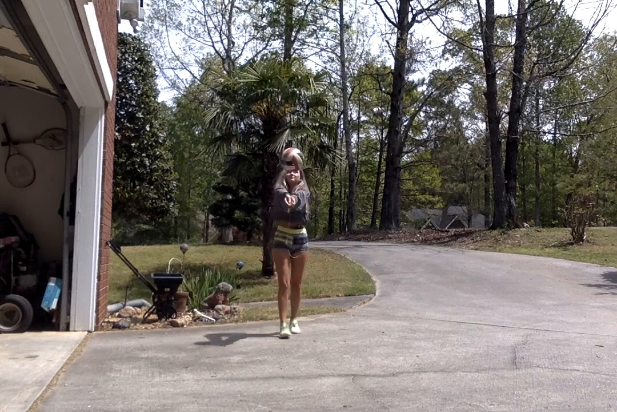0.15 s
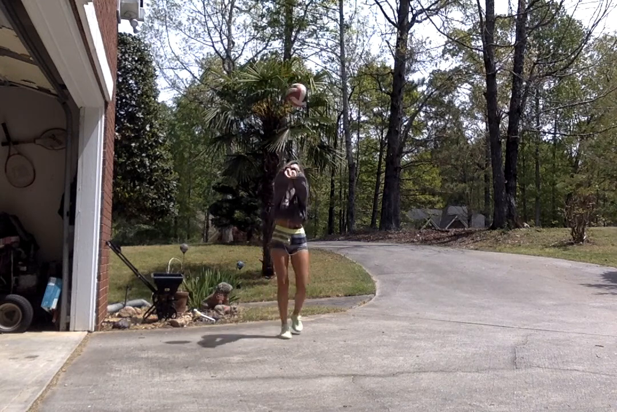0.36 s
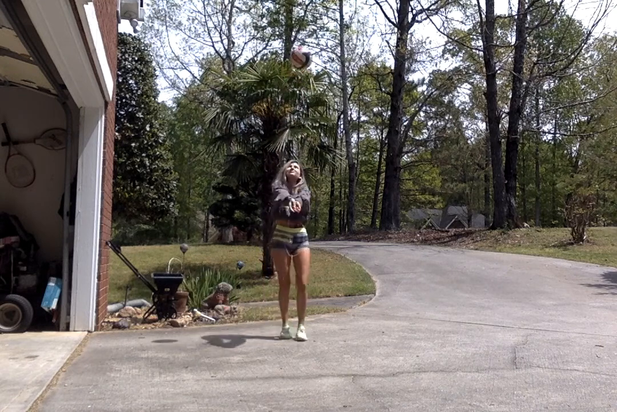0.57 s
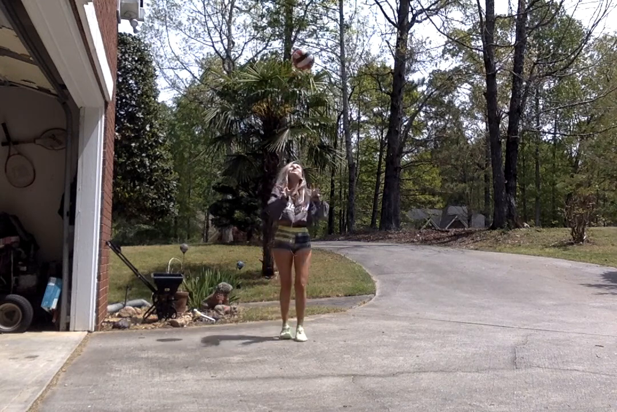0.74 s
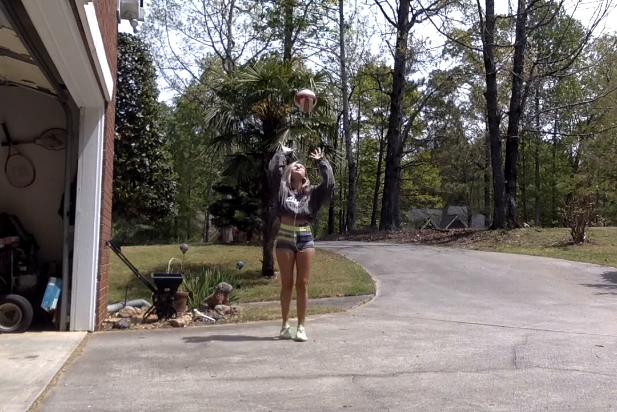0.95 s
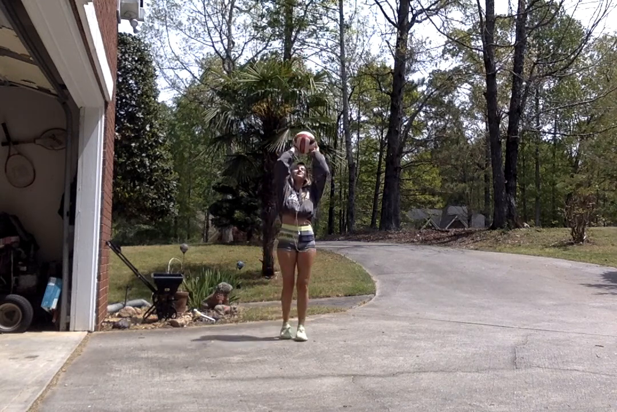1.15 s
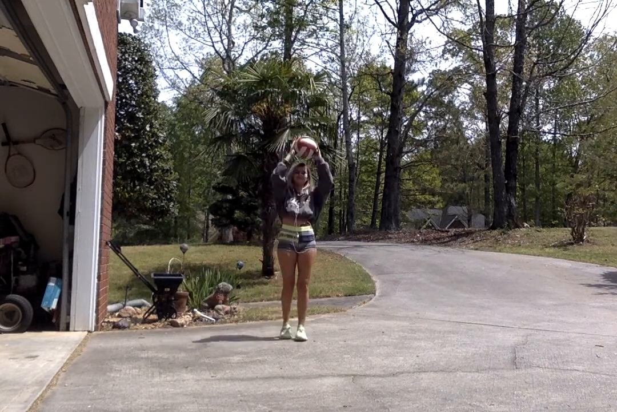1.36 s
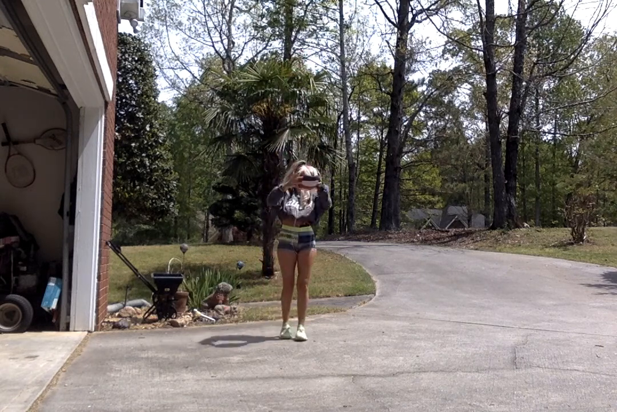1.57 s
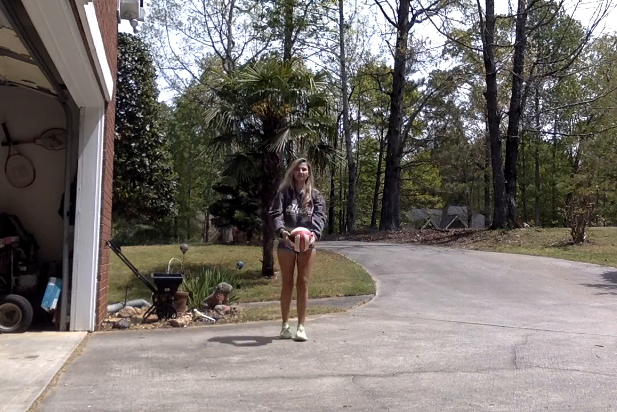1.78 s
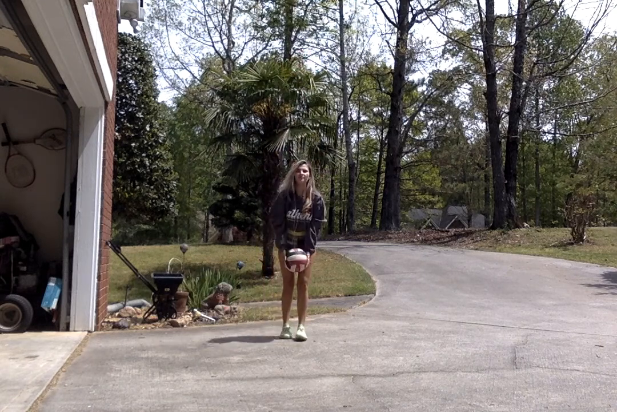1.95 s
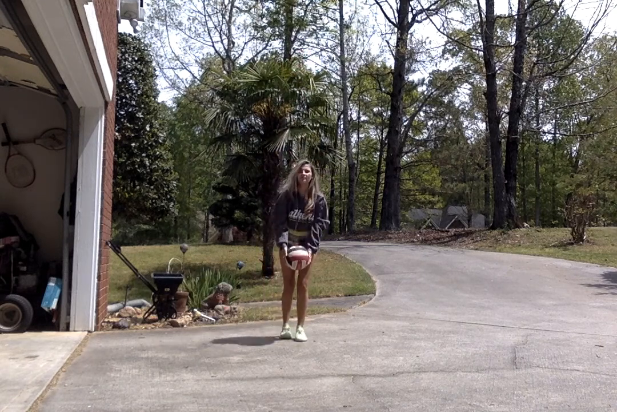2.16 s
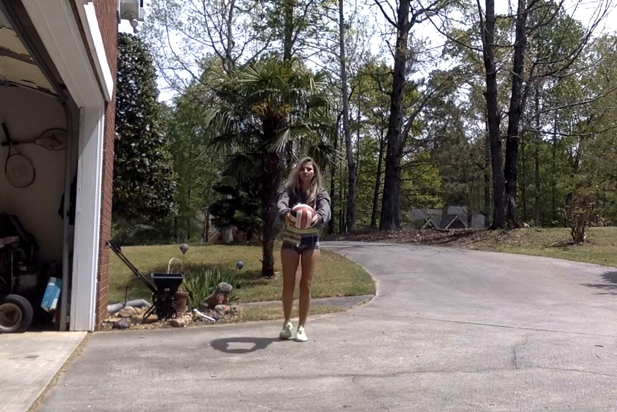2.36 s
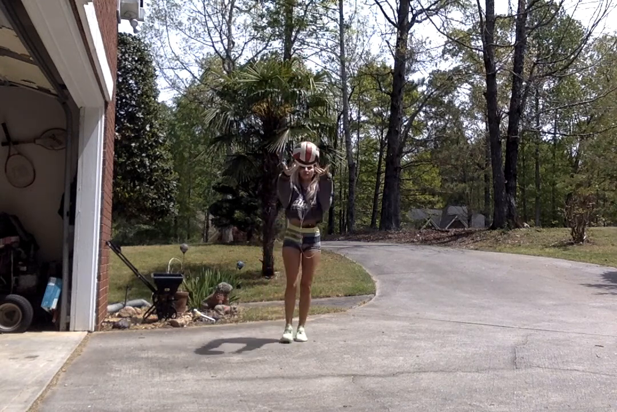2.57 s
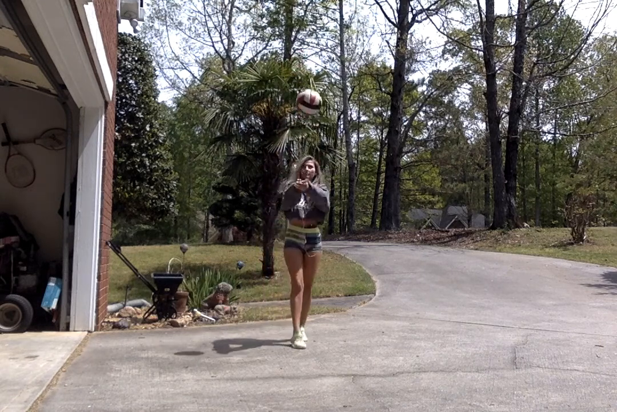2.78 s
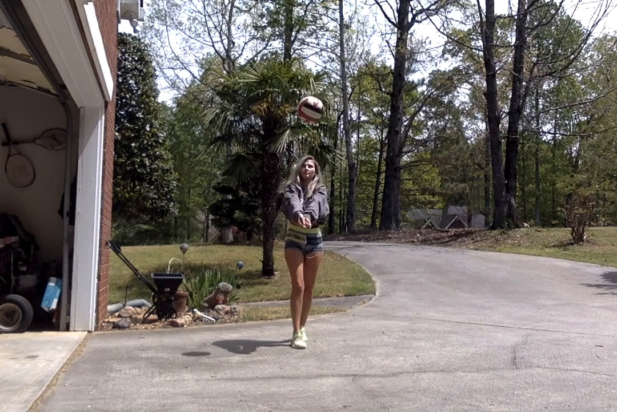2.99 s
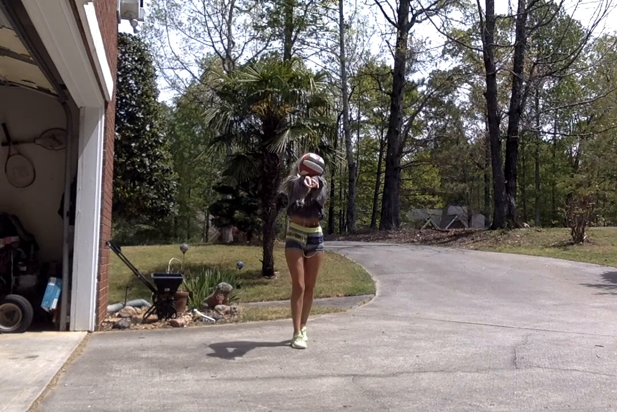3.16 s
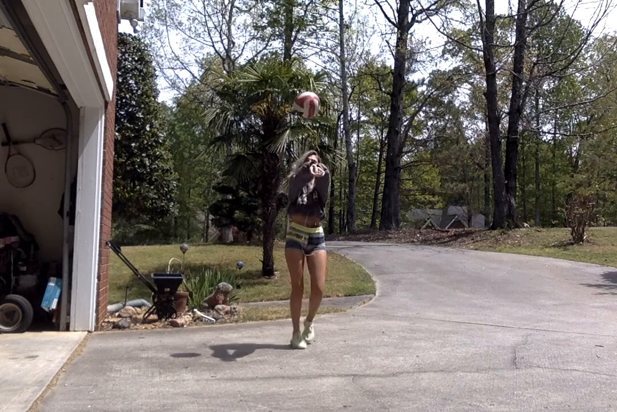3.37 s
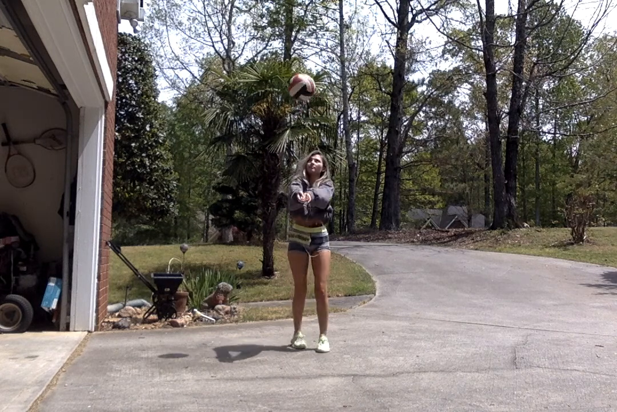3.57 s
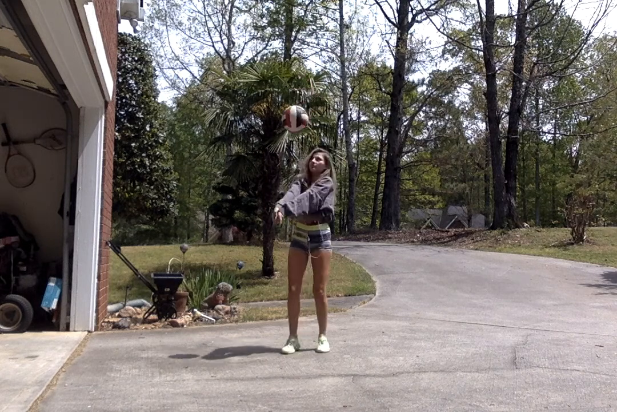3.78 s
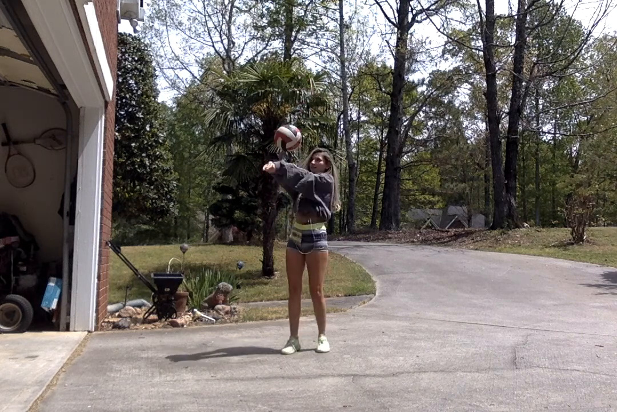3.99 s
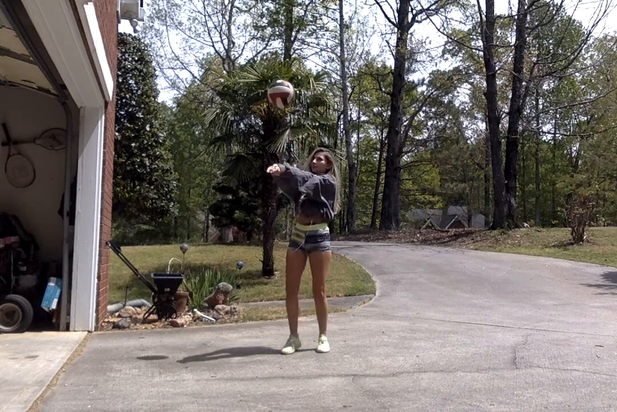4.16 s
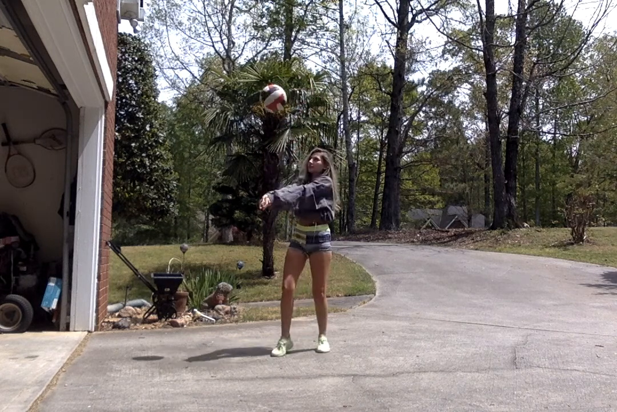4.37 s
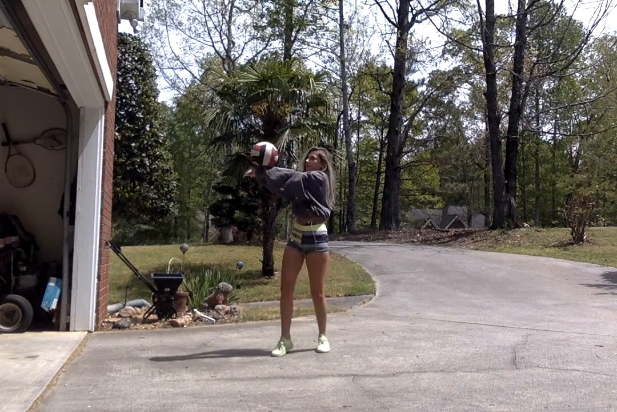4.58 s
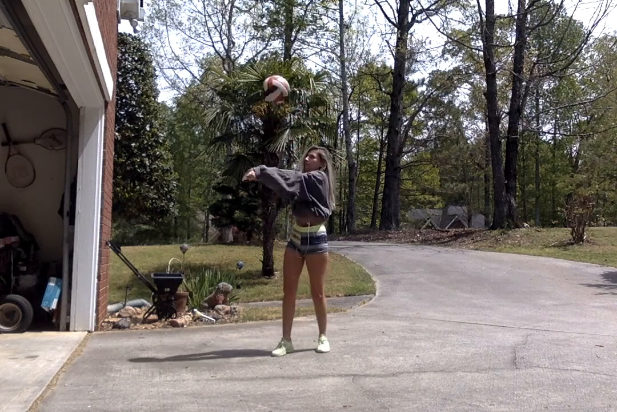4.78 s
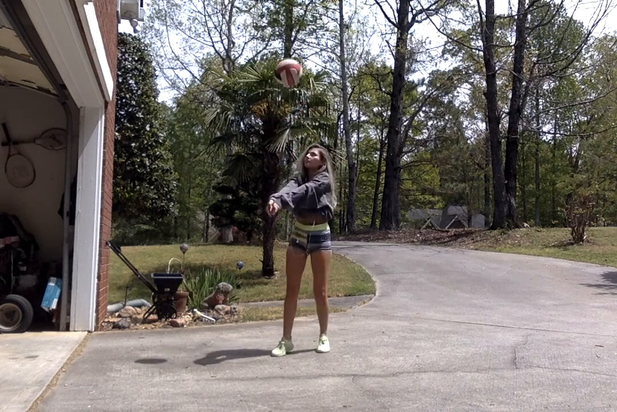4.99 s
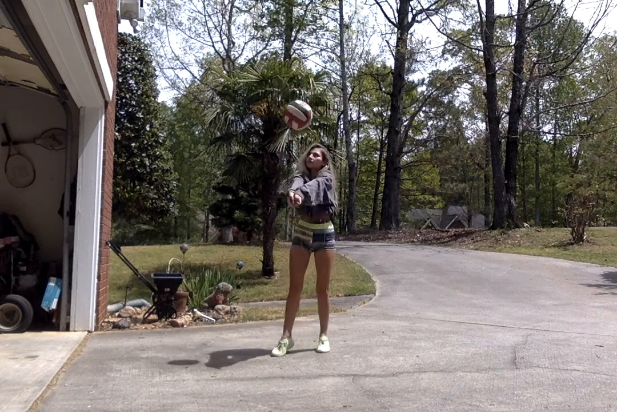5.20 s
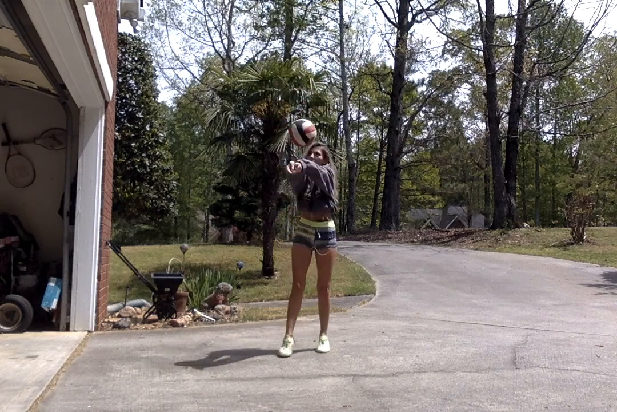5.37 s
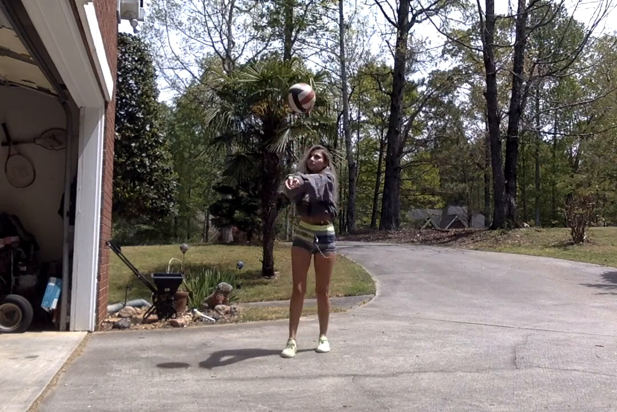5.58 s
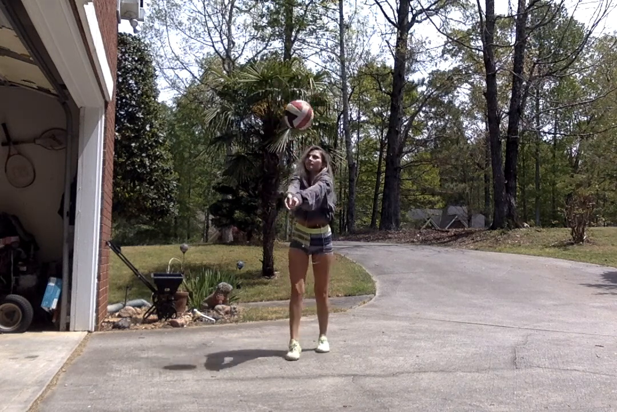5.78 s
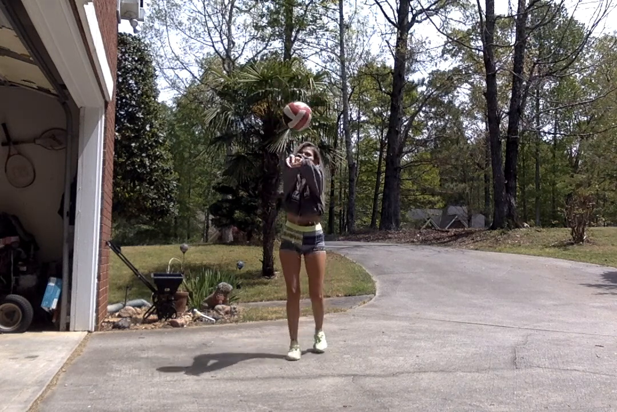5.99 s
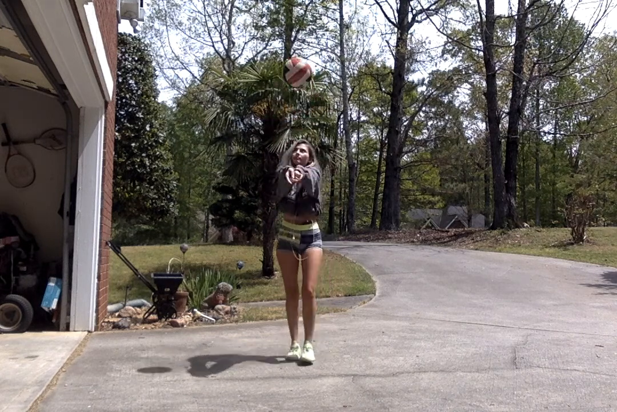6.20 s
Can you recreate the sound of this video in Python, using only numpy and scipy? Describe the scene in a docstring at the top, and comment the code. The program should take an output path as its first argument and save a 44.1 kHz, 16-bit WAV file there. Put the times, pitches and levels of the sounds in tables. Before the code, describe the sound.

Six sharp volleyball bumps slap and thump off forearms on a driveway, with light palm smacks, hollow wind buffeting, low hum and faint bird whistles.

```python
"""Volleyball beside an open garage

A ball is bumped off the forearms, caught and bumped again: each bump sums a slap (a noise burst coloured by the
microphone's housing), a thump (a sine sinking in pitch) and a ring (decaying air modes). Palms, brushes and
taps reuse the slap. Walls and garage answer by convolution with decaying noise. A breeze buffets the microphone
port with coloured noise and short tones, a bird whistles thin gliding sines, and the neighbourhood hums as
steady noise."""
import sys
import numpy as np
from scipy import signal
from scipy.io import wavfile

SR = 44100
rng = np.random.default_rng(int(sys.argv[2]) if len(sys.argv) > 2 else 0)


def transcribe(u):
    """Save the signal u as a 16-bit wav file named by the first command-line argument.

    u: samples, shape (n,) or (channels, n), limited to [-1, 1]; the rate is SR.
    q: integer samples, one column per channel.
    """
    v = np.clip(np.atleast_2d(u).T, -1, 1)
    q = np.round(v * 32767).astype(np.int16)
    wavfile.write(sys.argv[1], SR, q)


N = 275184
TIME = np.arange(N) / SR

# All table levels are relative; the functions apply further gains.
# Turbulent gusts: crest t/s, buffeting level/dB, rush level/dB, rise width/s, fall width/s
GUSTS = [(.38, -65, -75.5, 0.14, 0.07), (1.0, -64.5, -87, 0.18, 0.083), (1.53, -50.5, -92, 0.2, 0.14),
         (1.88, -55.5, -78, 0.09, 0.17), (2.349, -52, -92, 0.23, 0.092), (2.659, -62.5, -70.5, 0.15, 0.052),
         (3.5, -50.5, -79, 0.1, 0.066), (3.65, -51.5, -60.5, 0.078, 0.12), (3.99, -60, -65, 0.078, 0.068),
         (4.25, -73, -69.5, 0.14, 0.11), (5.03, -53.5, -67.5, 0.072, 0.038), (5.25, -56, -68, 0.12, 0.18)]
# Strongest eddies at the port: crest t/s, level/dB, half length/s
STRONG_EDDIES = [(.509, -55, 0.012), (1.327, -44, .003), (1.502, -39, 0.0037), (1.553, -37, 0.004),
                 (2.721, -50, 0.00482), (3.467, -43.5, 0.00453), (3.616, -41, .003), (3.763, -51, 0.00625),
                 (5.031, -41.5, .007), (5.271, -45, 0.0098)]
# Spectral density of the buffeting: f/Hz, level/dB per Hz
BUFFET_SPECTRUM = [(60, -51), (120, -24.5), (200, -15.5), (270, -5), (325, 4), (400, -5), (500, -15),
                   (700, -52), (1200, -70.5)]
# Spectral density of the rush of air: f/Hz, level/dB per Hz
RUSH_SPECTRUM = [(350, -16), (520, 7.5), (680, 8.5), (900, 0.5), (1100, 1.5), (1350, -45), (2500, -37)]
# Spectral density of distant traffic and hum: f/Hz, level/dB per Hz
FAR_SPECTRUM = [(25, -52), (50, -40), (64, 0.5), (80, -1.5), (110, 5), (160, -6.5), (230, -0.5), (300, -3),
                (420, -12.5), (700, -13), (1050, -17.5), (1400, -26), (3700, -27.5), (6700, -41),
                (15500, -36)]
# Forearm bumps: t/s, slap level/dB, hollow level/dB, body level/dB, crack level/dB, sizzle level/dB,
# air pocket f/Hz, decay/s, thump level/dB, ring level/dB
BUMPS = [(0.2605, -38, 5.5, -1, -2.5, -15, 1380, 0.0061, -20.5, -50),
         (3.2609, -45, 12, 2.5, -10.5, -11, 1870, 0.00515, -29, -71),
         (3.9828, -46, 7.5, -1, 2, 7, 1730, .0048, -40.5, -66),
         (4.6579, -36, -0.5, -1.5, 2.5, -24, 3470, .0031, -25.5, -68),
         (5.392, -38.5, 9, 0.5, -15, -15, 1740, 0.0033, -32, -70),
         (5.9909, -41.5, -1, -3.5, -3, -14, 2990, 0.0045, -27.5, -67)]
# Resonances of the microphone's housing, which colour every slap: f/Hz, width/Hz, level/dB
HOUSING_PEAKS = [(352, 220, -4), (740, 142, 0.5), (1203, 134, -11.5), (1782, 316, 2), (2296, 240, 2.5),
                 (2762, 260, 1.5), (3816, 310, 3.5), (4060, 390, -3), (5500, 500, -17.5), (6200, 7100, -41),
                 (12550, 2900, -32), (14300, 2620, -12)]
# Modes of the air in the ball: f/Hz, level/dB, 60 dB decay time/s
BALL_MODES = [(653, 25, 0.14), (1066, 0.5, 0.65), (1820, 0, 0.23), (1745, -18.5, 0.1), (2280, -5, 0.31),
              (2523, 2, 0.27), (2990, -8.5, 0.17), (3080, -10, 0.37), (3850, -19, 0.58), (4170, -8, 0.1)]
# Resonances of the tail (low boom, microphone port, garage): f/Hz, width/Hz, level/dB
TAIL_PEAKS = [(104, 36, 6), (323, 203, 19), (2350, 160, -2.5)]
# Reverberation of the garage: f/Hz, 60 dB decay time/s
GARAGE_T60 = [(100, 0.15), (1000, 0.29), (2500, 0.3), (4000, 0.25), (8000, 0.48), (15000, 0.086)]
# Bird calls: middle t/s, top f/Hz, level/dB
BIRD_CALLS = [(.407, 8160, -88), (1.79, 7960, -87), (2.86, 8100, -91), (3.52, 8100, -91),
              (4.363, 8230, -87.5), (5.46, 8100, -86.5)]
# Palms on each other and on the ball: t/s, level/dB, hollow level/dB, body level/dB, crack level/dB,
# sizzle level/dB, air pocket f/Hz
PALM_CONTACTS = [(0.676, -46, -20, -6, -1.5, -16, 1620), (0.6856, -43.5, -6, 5.5, 6, -4.5, 1230),
                 (1.1309, -42.5, -14, -9, 0, 11.5, 1970), (1.1396, -48.5, -13, 12.5, -14, 15.5, 2300),
                 (3.8747, -47.5, -15, 4.5, 12, -17, 4660), (3.8943, -56.5, 3, -3, -4, 14, 1980),
                 (4.4087, -54.5, -18, 4, 7, 6, 2390), (4.4177, -59.5, -11, 9, -12, 1, 2620)]
# Light brushes of fingers and sleeves, and light taps: t/s, level/dB, decay/s
BRUSHES = [(.988, -68, .002), (2.015, -86.5, .022), (2.349, -76.5, 0.0087), (2.3683, -73.5, 0.015),
           (3.63, -67, 0.00432), (3.7405, -78.5, 0.0069)]
# Colour of every brush and tap: hollow level/dB, body level/dB, crack level/dB, sizzle level/dB, air pocket
# f/Hz
BRUSH_COLOUR = (-22, 3.5, 5, 0, 4092)

CALM_BUFFET_DB, CALM_RUSH_DB = -70.5, -77  # the air between gusts
PORT_HZ = 319.7  # centre about which each eddy is detuned
# lesser eddies: mean rate, half length, crest over the buffeting strength
EDDIES_PER_S, EDDY_HALF_S, EDDY_DB = 9, 0.003965, 6
FAR_DB = -68.5
SQUASH_LAG_S, SWELL_S = 0.0033, 0.0048  # delay of thump and ring after the slap; time scale of the swell
FIRM_DB, FIRM_HZ, STIFFEN_HZ_PER_DB = -26, 197, 5  # a harder bump starts its swing at a higher pitch
SHELL_DB = -15  # shell wobble against the thump
RING_HZ = 2450  # pitch around which a touch favours the air modes
CATCH_S, CATCH_RING_DB = 1.138, -61.5
CALL_S = 0.087
PALM_DECAY_S = 0.002854
CUTOFF_HZ = 15900


def from_db(db):
    """Level definition: amplitude is ten to the power of level over twenty."""
    return 10 ** (np.asarray(db) / 20)


def rms_one(x):
    """Normalization by the root mean square."""
    return x / np.sqrt(np.mean(x ** 2) + 1e-20)


def at_hz(points, hz):
    """Linear interpolation of a table on a logarithmic frequency axis."""
    table = np.array(points)
    return np.interp(np.log(hz), np.log(table[:, 0]), table[:, 1])


def add(out, s, sound):
    """Superposition: a sound is mixed in at time s."""
    start = round(s * SR)
    out[start:start + len(sound)] += sound[:N - start]


def bandpass(x, edges, order):
    """Band-pass filtering by a Butterworth network."""
    sos = signal.butter(order, edges, "band", fs=SR, output="sos")
    return signal.sosfilt(sos, x + 1e-18)


def bands(white):
    """Third-octave analysis: yields each centre frequency and its band of noise."""
    edges = 28 * 2 ** (np.arange(29) / 3)
    for k, (low, high) in enumerate(zip(edges, edges[1:])):
        # neighbouring bands come from two unrelated noises
        yield np.sqrt(low * high), bandpass(white[k % 2], [low, high], 3)


def coloured(spectrum):
    """Spectral shaping: weighted noise bands sum to steady noise of rms 1."""
    white = rng.standard_normal((2, N))
    return rms_one(sum(from_db(at_hz(spectrum, hz)) * band for hz, band in bands(white)))


def drift(rate_hz):
    """Low-pass filtered noise: a smooth random fluctuation of rms 1."""
    sos = signal.butter(2, rate_hz, fs=SR, output="sos")
    return rms_one(signal.sosfilt(sos, rng.standard_normal(N + SR))[SR:])


def bell(t, width):
    """Gaussian envelope: a smooth swell of height 1 around t = 0."""
    return np.exp(-0.5 * np.minimum((t / width) ** 2, 100))


def gusts():
    """Root-sum-square addition: gusts swell out of the calm in buffeting and in rush."""
    buffet, rush = from_db(CALM_BUFFET_DB), from_db(CALM_RUSH_DB)
    for s, buffet_db, rush_db, rise, fall in GUSTS:
        swell = bell(TIME - s, np.where(TIME < s, rise, fall))
        buffet = np.hypot(buffet, from_db(buffet_db) * swell)
        rush = np.hypot(rush, from_db(rush_db) * swell)
    return buffet, rush


def eddy(half_s, detune=0.057):
    """Cavity excitation: one eddy sounds the port for a few cycles, cresting four half lengths in."""
    t = TIME[:int(8 * half_s * SR)]
    hz = PORT_HZ * (1 + detune * rng.uniform(-0.67, 1))
    tone = np.sin(2 * np.pi * (hz * t + rng.random()))
    return bell(t - 4 * half_s, half_s) * tone


def breeze(buffet_db=-2, rush_db=-3.0, lumpy_db=3.0, rush_lumpy_db=1.5):
    """Turbulent flow over a port: modulated noise and hollow tones; lesser eddies grow with the gust."""
    buffet, rush = gusts()
    lumps = drift(10)
    out = buffet * from_db(buffet_db + lumpy_db * lumps) * coloured(BUFFET_SPECTRUM)
    out += rush * from_db(rush_db + rush_lumpy_db * lumps) * coloured(RUSH_SPECTRUM)
    births = np.flatnonzero(rng.random(N) < EDDIES_PER_S / SR)
    lesser = [(i / SR, 20 * np.log10(buffet[i]) + EDDY_DB, EDDY_HALF_S) for i in births]
    for s, db, half_s in STRONG_EDDIES + lesser:
        add(out, max(s - 4 * half_s, 0), from_db(db) * eddy(half_s))
    return out


def distant_hum():
    """Stationary noise: far traffic and hum at a constant level."""
    return from_db(FAR_DB) * coloured(FAR_SPECTRUM)


def slap(db, hollow_db, body_db, crack_db, sizzle_db, pocket_hz, decay, rise_share=0.18, edge_db=2,
         pocket_db=5, snap=0.57, ground_s=0.0033, ground_db=-6, pocket_width_hz=480):
    """Impulsive excitation: squeezed air spurts, with a snap at its crest, and the housing colours it."""
    t = TIME[:SR // 8]
    envelope = np.exp(-t / decay) * (1 - np.exp(-t / (rise_share * decay)))
    burst = rng.choice([-1, 1], len(t)) * envelope
    burst[np.argmax(np.abs(burst))] += snap * np.linalg.norm(burst)
    # the concrete throws a duller copy back a moment later
    dull = signal.lfilter([0.5], [1, -0.5], burst)
    burst = burst + from_db(ground_db) * np.interp(t - ground_s, t, dull, left=0)
    # cupped contact sounds hollow, flat contact cracks and sizzles: f/Hz, level/dB
    contact = [(330, hollow_db / 2), (720, hollow_db), (1220, hollow_db), (1770, 0),
               (2330, body_db), (2750, body_db), (3750, crack_db), (4170, crack_db),
               (5400, crack_db + edge_db), (7000, crack_db + edge_db), (12000, sizzle_db)]
    peaks = [(hz, width, peak_db + at_hz(contact, hz)) for hz, width, peak_db in HOUSING_PEAKS]
    # air trapped under the skin adds a resonance of its own
    peaks.append((pocket_hz, pocket_width_hz, pocket_db))
    out = 0
    for hz, width, peak_db in peaks:
        edges = np.clip([hz - width / 2, hz + width / 2], 20, SR / 2 - 100)
        out = out + from_db(db + peak_db) * bandpass(burst, edges, 2)
    return out


def forearms(level_db=9.5):
    """Impact on soft tissue: the ball slaps the skin of the arms."""
    out = np.zeros(N)
    for s, *contact, _thump_db, _ring_db in BUMPS:
        add(out, s, slap(*contact))
    return from_db(level_db) * out


def thumps(rest_hz=104, settle=0.0036, shell_hz=228, shell_decay=0.012):
    """Elastic rebound: the flattened ball swings back, sinking in pitch, while its shell wobbles faster."""
    out, t = np.zeros(N), TIME[:SR // 8]
    swell = np.sqrt(t / SWELL_S) * np.exp((1 - (t / SWELL_S) ** 1.87) / 4.56)
    shell = from_db(SHELL_DB) * np.exp(-t / shell_decay) * np.sin(2 * np.pi * shell_hz * t)
    for s, *_, thump_db, _ring_db in BUMPS:
        start_hz = FIRM_HZ + STIFFEN_HZ_PER_DB * (thump_db - FIRM_DB)
        hz = rest_hz + (start_hz - rest_hz) * np.exp(-t / settle)
        swing = swell * np.sin(2 * np.pi * np.cumsum(hz) / SR)
        add(out, s + SQUASH_LAG_S, from_db(thump_db) * (swing + shell))
    return out


def ball_ring(centre_hz, spread_db=13, waver=0.94, waver_hz=70):
    """Modal decay: contact favours air modes near one pitch; their phases waver."""
    t = TIME[:SR // 2]
    hz, db, t60 = np.array(BALL_MODES).T[:, :, None]
    # spread_db is lost per octave from the centre; waver is the rms phase in radians
    level_db = db - spread_db * np.abs(np.log2(hz / centre_hz)) - 60 * t / t60
    sos = signal.butter(2, waver_hz, fs=SR, output="sos")
    wobble = rms_one(signal.sosfilt(sos, rng.standard_normal(level_db.shape)))
    modes = from_db(level_db) * np.sin(2 * np.pi * hz * t + waver * wobble)
    return np.sum(modes, axis=0)


def rings():
    """Free vibration of enclosed air: each bump, and the catch, leaves the ball ringing."""
    out = np.zeros(N)
    for s, *_, ring_db in BUMPS:
        add(out, s + SQUASH_LAG_S, from_db(ring_db) * ball_ring(RING_HZ))
    add(out, CATCH_S, from_db(CATCH_RING_DB) * ball_ring(RING_HZ))
    return out


def garage(x, tail_db=-14, early_db=-10, early_decay=0.0084):
    """Reflection and reverberation: ground and house wall reply quickly, the open garage adds a faint tail."""
    t = TIME[:SR // 2]
    # each band of the tail dies at its own rate
    white = rng.standard_normal((2, len(t)))
    tail = sum(band * from_db(-60 * t / at_hz(GARAGE_T60, hz)) for hz, band in bands(white))
    tail = tail * (1 - np.exp(-t / 0.0038))  # gradual build-up
    tail = tail / np.linalg.norm(tail)
    # low boom, microphone port and garage resonate in the tail
    resonant = 0
    for hz, width, db in TAIL_PEAKS:
        resonant = resonant + from_db(db) * signal.lfilter(*signal.iirpeak(hz, hz / width, fs=SR), tail)
    tail = tail + resonant / 2
    early = rng.standard_normal(len(t)) * np.exp(-t / early_decay) * (t > 0.003)
    early = signal.sosfilt(signal.butter(2, 300, "high", fs=SR, output="sos"), early)
    early = early / np.linalg.norm(early)
    response = from_db(tail_db) * tail + from_db(early_db) * early
    return signal.fftconvolve(x, response)[:N]


def bird(arch_hz=330, droop_hz=650, echo_db=-6):
    """Frequency modulation and scattering: thin arched whistles droop at the end, smeared by the trees."""
    out, t = np.zeros(N), TIME[:SR // 4]
    u = np.linspace(-1, 1, int(CALL_S * SR))  # position within the call
    for s, top_hz, db in BIRD_CALLS:
        hz = top_hz - arch_hz * u ** 2 - droop_hz * np.maximum(u, 0) ** 4
        hz = hz + 45 * drift(200)[:len(u)]
        whistle = np.sqrt(1 - u ** 2) * np.sin(2 * np.pi * np.cumsum(hz) / SR)
        add(out, s - CALL_S / 2, from_db(db) * whistle)
    trees = rng.standard_normal(len(t)) * np.exp(-t / 0.046)
    trees = trees / np.linalg.norm(trees)
    return out + from_db(echo_db) * signal.fftconvolve(out, trees)[:N]


def hands(level_db=12.0):
    """Contact impulses: palms meet briefly, each with its own colour; brushes and taps are soft slaps of one
    colour."""
    out = np.zeros(N)
    for s, *contact in PALM_CONTACTS:
        add(out, s, slap(*contact, PALM_DECAY_S))
    for s, db, decay in BRUSHES:
        add(out, s, slap(db, *BRUSH_COLOUR, decay))
    return from_db(level_db) * out


def scene():
    """Linear superposition: direct and reflected sound over the distant hum and the breeze."""
    arms, palms, thump = forearms(), hands(), thumps()
    direct = arms + palms + thump + rings() + bird()
    reflected = garage(from_db(-3.0) * arms + from_db(0.5) * palms + from_db(-4) * thump)
    return (direct + reflected + distant_hum() + breeze())[None]


def record(dry, bass_cut_hz=38):
    """Band limiting: the deepest bass and the top are cut."""
    thinned = signal.sosfilt(signal.butter(2, bass_cut_hz, "high", fs=SR, output="sos"), dry)
    return signal.sosfilt(signal.ellip(10, 0.3, 70, CUTOFF_HZ, fs=SR, output="sos"), thinned)


dry = scene()
out = record(dry)
transcribe(out)
```